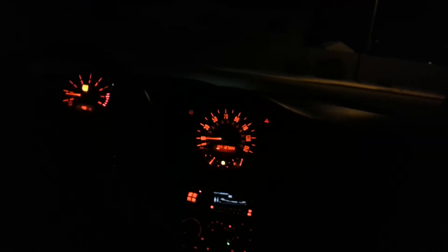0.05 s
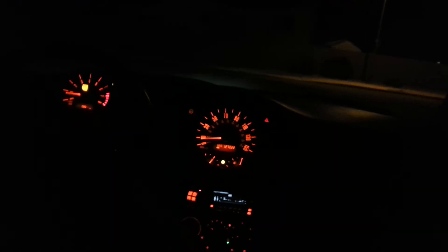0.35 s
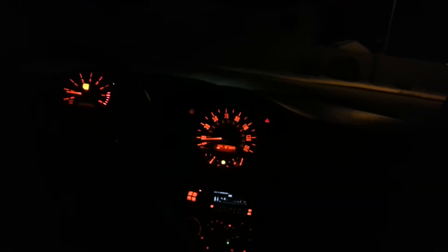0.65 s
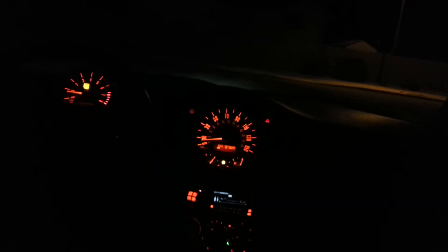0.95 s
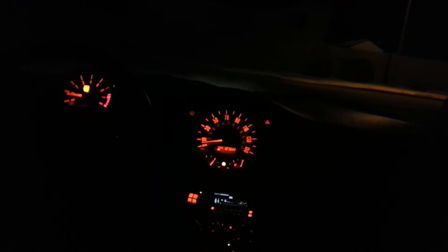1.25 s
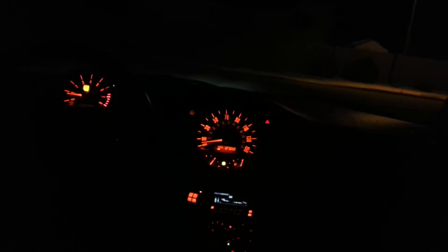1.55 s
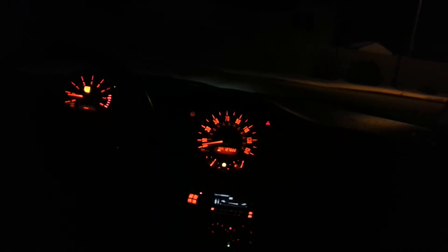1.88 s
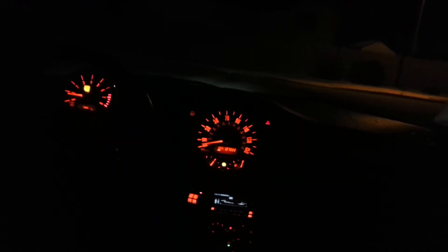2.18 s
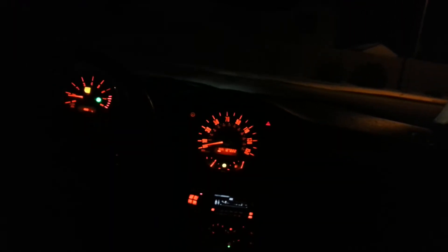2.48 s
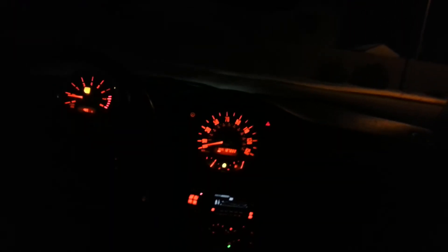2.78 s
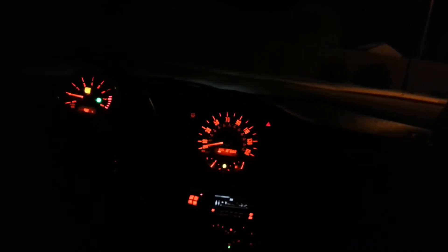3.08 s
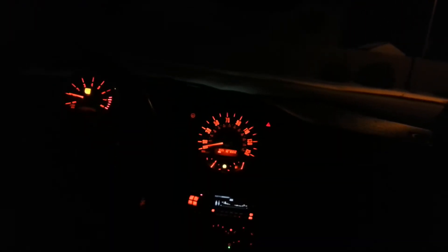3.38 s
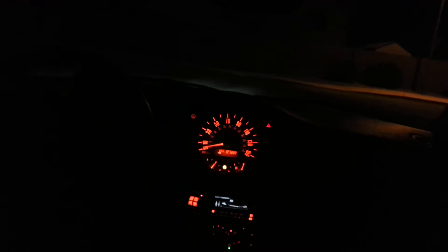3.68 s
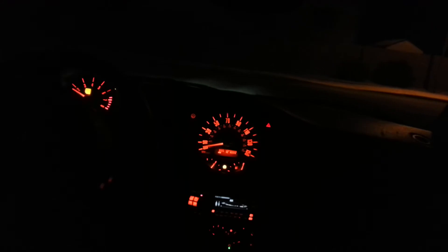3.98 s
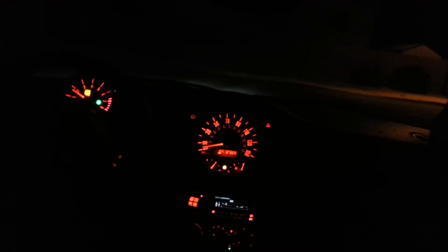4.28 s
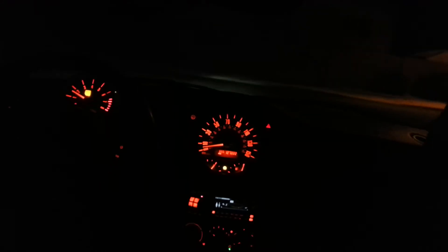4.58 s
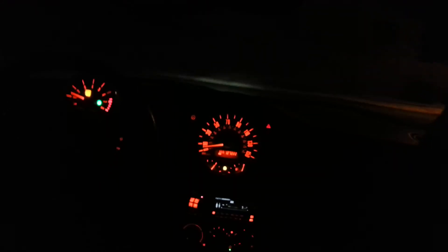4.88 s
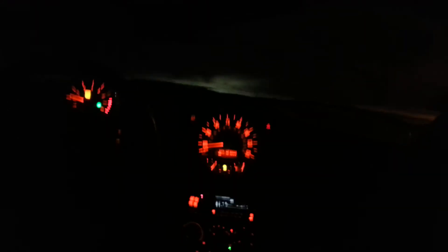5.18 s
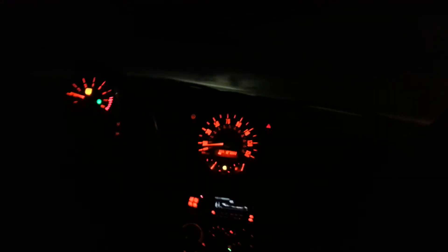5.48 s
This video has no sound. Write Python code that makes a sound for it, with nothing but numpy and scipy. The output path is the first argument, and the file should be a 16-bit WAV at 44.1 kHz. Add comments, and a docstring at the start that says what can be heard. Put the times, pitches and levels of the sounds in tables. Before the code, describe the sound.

Low tyre rumble and the hum of a four-cylinder engine fill a small car's interior, with soft road bumps and light trim clicks near the microphone. A sharp snap sets the turn signal ticking, and it keeps going to the end. Soon after, the car accelerates, the loud exhaust booming through the cabin and breaking into a raspy growl. It settles to a lower drone, with a final dull wheel thump.

```python
"""Inside a small four-cylinder car with a loud exhaust, rolling slowly at night.
At first the engine idles over rumbling tyres; hands rub on the controls, wheels thump and trim clicks.
Near 2.4 s the indicator stalk snaps over, and its relay ticks and tocks to the end.
Near 3 s the engine pulls and revs up in two steps, its orders booming through the cabin's resonances.
The exhaust breaks into a growl around 4 s, then the revs fall and the wheels take one last bump."""
import sys
import numpy as np
from scipy import signal
from scipy.fft import rfft, irfft, next_fast_len
from scipy.io import wavfile
from scipy.ndimage import uniform_filter1d, minimum_filter1d

SR = 44100
rng = np.random.default_rng(int(sys.argv[2]) if len(sys.argv) > 2 else 0)


def inscribe(sig):
    """Save sig as 16-bit PCM at rate SR to the path in sys.argv[1].

    A 1-D sig is mono; a 2-D sig holds one channel per row.
    Samples are clipped to [-1, 1] before scaling.
    """
    pcm = np.round(np.clip(np.atleast_2d(sig).T, -1, 1) * 32767)
    wavfile.write(sys.argv[1], SR, pcm.astype(np.int16))


N = 248724
T = np.arange(N) / SR


def from_db(db):
    """Decibels to gain."""
    return 10 ** (np.asarray(db) / 20)


def rms_one(x):
    """Scale to unit power."""
    return x / np.sqrt(np.mean(x ** 2) + 1e-20)


def in_time(rows):
    """Each column of an automation curve at every sample."""
    times, *columns = np.transpose(rows)
    return [np.interp(T, times, column) for column in columns]


def at_hz(points, hz):
    """Read a curve on a log-frequency axis."""
    freqs, values = np.transpose(points)
    return np.interp(np.log(hz + 1e-3), np.log(freqs), values)


def drift(rate):
    """Smooth random modulation with spread 1, changing about `rate` times a second."""
    hop = 100
    pole = np.exp(-2 * np.pi * rate * hop / SR)
    slow = signal.lfilter([1], [1, -2 * pole, pole ** 2], rng.standard_normal(N // hop + 502))[500:]
    return np.interp(np.arange(N) / hop, np.arange(len(slow)), rms_one(slow))


# Stereo width in the cabin. Each row: frequency in Hz, left-right likeness (1 is mono).
STEREO_LIKENESS = [(100, .995), (320, .98), (450, .7), (650, .45), (1000, 0), (14000, 0)]
def noise(spectrum, size=N, tilt_db=0):
    """Coloured stereo noise, near mono in the bass and wide in the treble; rms 1."""
    padded = next_fast_len(size)
    hz = np.fft.rfftfreq(padded, 1 / SR)
    mid, side = rfft(rng.standard_normal((2, padded)))
    alike = at_hz(STEREO_LIKENESS, hz)
    pair = np.sqrt(1 + alike) * mid + np.sqrt(1 - alike) * side * [[1], [-1]]
    lowest_hz = spectrum[0][0]
    colour = from_db(at_hz(spectrum, hz) + tilt_db * np.log2(1 + hz / lowest_hz))
    low_cut = hz ** 2 / (hz ** 2 + lowest_hz ** 2)
    return rms_one(irfft(pair * colour * low_cut, padded)[:, :size])


def response(modes, hz):
    """Complex gain of parallel resonances with alternating signs."""
    grid = np.arange(1, 4000.)
    gain = sum((-1) ** k * from_db(db) / (1 + 1j * (grid ** 2 - centre ** 2) / (grid * width))
               for k, (centre, width, db) in enumerate(modes))
    return np.interp(hz, grid, gain)


def overtones(speed, angle, orders, modes, half_order_db=0, flutter=.19):
    """Engine orders gliding through resonances; unequal cylinders add the half orders. Stereo, rms 1."""
    out, power = np.zeros((2, N)), 0
    for k in orders:
        gain = response(modes, k * speed) * from_db(half_order_db if k % 1 else 0)
        waver = 1 + flutter * (drift(8.9) + 1j * drift(10))
        # the many paths through the body scatter the phases
        line = gain * waver * np.exp(1j * (k * angle + 2 * np.pi * rng.random()))
        # short waves reach the two microphones out of step
        apart = np.arccos(at_hz(STEREO_LIKENESS, k * speed)) / 2 * rng.choice([-1, 1])
        out += np.cos(apart) * line.real + np.sin(apart) * line.imag * [[1], [-1]]
        power = power + np.abs(gain) ** 2
    return rms_one(out / np.sqrt(power))


def puffs(angle, depth):
    """Gas leaves in one puff per firing, two to a crank turn."""
    return rms_one(1 + depth * np.cos(2 * angle))


# Low resonances of pipe and cabin. Each row: centre in Hz, width in Hz, relative level in dB.
BOOM_RESONANCES = [(63.1, 1.6, 2.5), (114.9, 18.4, -0.5), (186, 47.4, -8.5), (227.3, 25.1, 1.5),
                   (247.8, 12.7, -11), (298.8, 28.2, -5.5), (325, 24.7, 2.5), (346, 73, -15.5),
                   (380.7, 52, -13)]
def exhaust_burble(speed, angle, level_db):
    """Unequal cylinders send fluttering half orders through the low resonances."""
    return from_db(level_db) * overtones(speed, angle, np.arange(2.5, 15), BOOM_RESONANCES)


# Orders 2 (the firing rate) to 12. Each row: relative level in dB, change at full growl in dB.
DRONE_ORDERS = [(1, 1), (0.5, -18.5), (1.34, -5), (-4.5, 19), (-0.5, 12.5), (-0.5, 5), (-2, 3), (-3, -6.5),
                (-8.5, 0), (-3, -3), (-5, 12)]
# The cabin's EQ; an order booms as it crosses a peak. Each row: frequency in Hz, gain in dB.
CABIN_EQ = [(50, -20), (67, -2), (76, -10.5), (88, -13), (101, -7), (116, 0), (124, -6.5), (145, -36.5),
            (168, -19.5), (200, -21), (228, -13.5), (245, -28), (297, -20.5), (324, -12), (365, -31),
            (560, -54)]
def drone(speed, angle, drive_db, growl):
    """Strong low orders coloured by the cabin, over the block's once-a-turn shake."""
    shake_db = -44.5 + 7.5 * np.log2(speed / speed.min())
    out = from_db(shake_db) * np.cos(angle)
    for k, (order_db, growl_db) in enumerate(DRONE_ORDERS, 2):
        # the cabin turns each order's phase and the silencer smears the pulses out
        phase = np.angle(response(BOOM_RESONANCES, k * speed)) - .3 * k * k
        waver_db = .2 * (k - 1) * drift(8)
        level_db = drive_db + order_db + growl_db * growl + at_hz(CABIN_EQ, k * speed) + waver_db
        out += from_db(level_db) * np.cos(k * angle + phase)
    return np.sqrt(2) * out


# High resonances of the tailpipe. Each row: centre in Hz, width in Hz, relative level in dB.
TAILPIPE_RESONANCES = [(650.4, 15.6, 1), (764, 34, -9), (826, 12, -11.5), (1010, 58, -12),
                       (1255, 29, -15.5), (1590, 96, -24.5), (1940, 120, -27)]
def exhaust_rasp(speed, angle, level_db):
    """Rushing gas at idle that turns into clear tailpipe tones as the engine revs."""
    clarity = .95 * (speed / speed.max()) ** 1.5
    lines = overtones(speed, angle, np.arange(9, 33, .5), TAILPIPE_RESONANCES, half_order_db=-6.745)
    gas_colour = [(300, -6), (420, 12.5), (650, 2.5), (850, -2.5),  # Hz, dB
                  (1200, -6.5), (1900, -10), (3500, -21), (9000, -54.5)]
    gas = noise(gas_colour) * puffs(angle, depth=.25)
    blend = np.sqrt(clarity) * lines + np.sqrt(2 * (1 - clarity)) * gas
    return from_db(level_db + 1.668 * drift(14)) * blend


# Colour of the intake air. Each row: frequency in Hz, relative level in dB.
INTAKE_COLOUR = [(900, -11.5), (1500, -0.5), (2000, 3.5), (2350, 3), (2700, 1.5), (4000, -2), (5200, -1),
                 (6200, -3.5), (7500, 3), (8600, -6), (11000, -10), (14500, -46.5)]
def intake_hiss(angle, level_db):
    """Air rushes into the engine, pulsing faintly at the firing rate."""
    return from_db(level_db) * noise(INTAKE_COLOUR) * puffs(angle, depth=.057)


# The rev curve. Each row: time in seconds, crank turns per second.
REVS = [(0, 23.6), (.16, 25.9), (.32, 22.3), (.75, 26.1), (2, 24.8), (2.6, 25.15), (2.8, 27.2), (2.9, 28.7),
        (3, 32.5), (3.27, 33), (3.43, 39.5), (3.52, 48.1), (3.69, 54.2), (4.08, 60.1), (4.33, 59.8),
        (4.45, 54.7), (4.6, 47.4), (4.85, 40.6), (5.06, 38), (5.3, 37.3), (5.64, 37.8)]
# Exhaust faders under load. Each row: time in seconds, burble in dB, rasp before the growl's boost in dB.
EXHAUST_FADERS = [(0, -33, -47), (.3, -30.5, -47.5), (1.1, -35, -52.5), (2.85, -32.5, -55),
                  (3.08, -28, -42), (3.3, -38, -45), (3.5, -26.5, -41.5), (3.7, -27.5, -35.5),
                  (3.92, -32, -37), (4.15, -23, -36), (4.5, -27.5, -39), (4.85, -28, -45.5),
                  (5.05, -26, -40), (5.64, -24.5, -40.5)]
def engine():
    """One crank drives drone, burble, rasp and hiss; load lifts them and high revs add a growl."""
    speed, = in_time(REVS)
    burble_db, rasp_db = in_time(EXHAUST_FADERS)
    pull = np.clip((T - 2.93) / .14, 0, 1)  # takes up the load at 2.93 s and holds it
    growl = np.clip((speed - 57.2) / 2.5, 0, 1)  # opens above 57.2 turns per second
    angle = 2 * np.pi * np.cumsum(speed) / SR + .012 * drift(12)
    return (drone(speed, angle, drive_db=-21 + 11 * pull, growl=growl)
            + exhaust_burble(speed, angle, burble_db)
            + exhaust_rasp(speed, angle, rasp_db + 7.5 * growl)
            + intake_hiss(angle, level_db=-55 + 6 * pull))


# Colour of tyres and ventilation. Each row: frequency in Hz, relative level in dB.
ROAD_COLOUR = [(18, 3), (30, -0.5), (55, 1), (110, -3.5), (160, 1), (230, 3.5), (325, -5.5), (380, -7),
               (480, -15), (700, -22.5), (1000, -24.5), (1600, -32), (3000, -46.5)]
def road_rumble():
    """Rolling tyres and ventilation lay down a dark, gently wavering bed."""
    return noise(ROAD_COLOUR) * from_db(-34 + .5 * drift(8.2))


# Panel hum, then pump whine. Each row: pitch in Hz, level in dB, wavers per second, wavering power share.
HUM_AND_WHINE = [(322, -36.5, 6, .2), (2370, -66, 60, 1)]
def cabin_hum_and_whine():
    """A cabin panel's steady 322 Hz hum rings beside a pump's faint, wavering whine."""
    out = 0
    for hz, db, rate, share in HUM_AND_WHINE:
        amplitude = np.sqrt(2 * (1 - share)) + np.sqrt(share) * (drift(rate) + 1j * drift(rate))
        out = out + from_db(db) * (amplitude * np.exp(2j * np.pi * hz * T)).real
    return out


# Hand moves. Each row: middle in seconds, half length in seconds, level in dB, tilt in dB per octave.
HAND_MOVES = [(0.231, 0.16, -41.5, -2), (0.586, 0.097, -49, -5.5), (1.266, 0.11, -42, -13),
              (1.593, 0.067, -50, 6), (1.789, 0.075, -53.5, 5), (2.889, 0.056, -44, 8.5),
              (5.468, 0.036, -47.5, 3.5)]
# Colour of the friction. Each row: frequency in Hz, relative level in dB.
RUB_COLOUR = [(300, -3), (800, -6.5), (2500, -4), (5000, -11.5), (7500, -8), (9000, -19), (13500, -32)]
def hand_rubs():
    """Hands slide on wheel and lever in soft swells of grainy friction noise."""
    out = np.zeros((2, N))
    for middle, half_length, db, tilt_db in HAND_MOVES:
        swell = np.exp(-((T - middle) / half_length) ** 2)
        out += from_db(db) * swell * noise(RUB_COLOUR, tilt_db=tilt_db)
    grain = from_db(2.2 * drift(45))
    return out * grain


def knocks(hits, colour, t60, rise_s, modes=()):
    """One part struck at each hit: a crack, a dense ring dying fast in the padded cabin, any modes."""
    t = T[:SR // 3]
    crack = .24 * np.exp(-t / .0058)
    ring = noise(colour, size=len(t)) * (from_db(-60 * t / t60) + crack)
    for hz, db, mode_t60 in modes:
        ring += from_db(db - 60 * t / mode_t60) * np.sin(2 * np.pi * (hz * t + rng.random((2, 1))))
    ring *= 1 - np.exp(-t / rise_s)
    out = np.zeros((2, N + len(t)))
    for start, db in hits:
        at = round(start * SR)
        out[:, at:at + len(t)] += from_db(db) * ring
    return out[:, :N]


# Bumps in the road. Each row: start in seconds, level in dB.
BUMP_HITS = [(0.147, -20.5), (0.245, -29), (1.103, -26.5), (5.355, -21)]
# Colour of the thump. Each row: frequency in Hz, relative level in dB.
BUMP_COLOUR = [(110, -4), (200, -4), (300, -4), (400, 3), (520, -4), (620, -13), (800, -16), (1500, -24),
               (3000, -42), (8000, -58)]
def wheel_bumps():
    """The wheels roll over bumps with a dull, soft-edged thump."""
    return knocks(BUMP_HITS, BUMP_COLOUR, t60=.16, rise_s=.005)


# Clicks of gear lever and trim. Each row: start in seconds, level in dB.
TRIM_HITS = [(0.197, -38), (1.282, -45.5), (2.292, -43.5), (3.545, -39), (3.585, -26), (3.592, -30.5),
             (3.603, -29), (4.579, -41.5), (4.715, -42), (5.22, -41.5)]
# Colour of the click. Each row: frequency in Hz, relative level in dB.
TRIM_COLOUR = [(800, -1.5), (2400, -3), (3300, 1), (4000, 1), (5300, 2.5), (6500, -1.5), (7500, -0.5),
               (9000, -7.5), (11000, -15.5), (14000, -36)]
# The trim's clear modes. Each row: pitch in Hz, relative level in dB, seconds to fall 60 dB.
TRIM_MODES = [(3120, -20, .07), (5250, -10, 0.065)]
def trim_clicks():
    """Gear lever and trim knock lightly, giving small bright clicks."""
    return knocks(TRIM_HITS, TRIM_COLOUR, t60=.12, rise_s=.0019, modes=TRIM_MODES)


# The relay's ticks and tocks. Each entry: start in seconds.
TICK_STARTS = [2.373, 3.029, 3.663, 4.3176, 4.9532, 5.5887]
TOCK_STARTS = [2.727, 3.3646, 4.0169, 4.652, 5.2874]
# Colour of each stroke. Each row: frequency in Hz, relative level in dB.
TICK_COLOUR = [(500, -28), (1000, -3.5), (1500, -6), (1880, -3), (2100, -7), (3800, -8), (5050, 1.5),
               (5500, -3.5), (7200, 2), (8000, -10.5), (10500, -17.5), (14000, -38)]
TOCK_COLOUR = [(500, 20), (1100, -2), (1330, 1.5), (1700, -14.5), (2450, -1.5), (3400, -11), (4300, -18),
               (5000, -8), (5500, -13), (6500, -7.5), (9000, -16.5), (14000, -17)]
# Modes of the relay's case. Each row: pitch in Hz, relative level in dB, seconds to fall 60 dB.
TICK_CASE_MODES = [(1880, -11, .085), (5050, -8, .085), (7250, -7, .08)]
TOCK_CASE_MODES = [(1330, -4, .09), (2460, -10, .08), (6420, -11, .07)]
def indicator_relay(tick_db=-28, tock_db=-32):
    """The relay pulls in with a sharp tick and lets go with a duller tock, ringing its case."""
    pull_ins = [(start, tick_db) for start in TICK_STARTS]
    releases = [(start, tock_db) for start in TOCK_STARTS]
    ticks = knocks(pull_ins, TICK_COLOUR, t60=.094, rise_s=.00013, modes=TICK_CASE_MODES)
    tocks = knocks(releases, TOCK_COLOUR, t60=.11, rise_s=.0004, modes=TOCK_CASE_MODES)
    return ticks + tocks


# The stalk's snap. Each row: start in seconds, level in dB.
SNAP_HITS = [(2.4379, -11.5)]
# Colour of the snap. Each row: frequency in Hz, relative level in dB.
SNAP_COLOUR = [(200, 8.5), (500, -9), (1000, -3.5), (1500, -10), (2350, -5.5), (3000, -7), (4600, -7),
               (5400, 2.5), (6600, -7), (7700, 1), (9000, -9.5), (13500, -22.5)]
# The stalk's clear modes. Each row: pitch in Hz, relative level in dB, seconds to fall 60 dB.
SNAP_MODES = [(556, -15, .11), (2380, -13, .12), (5440, -11, .07)]
def indicator_stalk():
    """The stalk snaps over once and rings briefly."""
    return knocks(SNAP_HITS, SNAP_COLOUR, t60=.088, rise_s=.002, modes=SNAP_MODES)


def scene():
    """Engine and road fill the cabin; the small sounds are close by."""
    road = road_rumble() + wheel_bumps()
    controls = indicator_relay() + indicator_stalk() + trim_clicks()
    return road + controls + engine() + cabin_hum_and_whine() + hand_rubs()


def limiter(x, ceiling=.77, window=SR // 30):
    """The gain ducks smoothly around any peak above the ceiling."""
    gain = np.minimum(1, ceiling / (np.abs(x).max(axis=0) + 1e-9))
    held = minimum_filter1d(gain, size=window)
    return x * uniform_filter1d(held, size=window)


# Balance of the two microphones. Each row: frequency in Hz, left minus right in dB.
MIC_BALANCE = [(60, -.8), (300, .4), (550, -1), (1000, 3.5), (2200, 3), (4000, 3), (6000, 2.5), (6800, -2),
               (7600, -10), (9500, -6), (13000, -2)]
# Phase between them. Each row: frequency in Hz, the left's lead in radians.
MIC_LEAD = [(120, .23), (350, .15), (700, 0)]
def record(dry):
    """Each microphone port has its own colour and phase; peaks are limited and the top is cut."""
    padded = next_fast_len(N + SR // 10)
    hz = np.fft.rfftfreq(padded, 1 / SR)
    split = np.array([[.5], [-.5]])
    ports = from_db(split * at_hz(MIC_BALANCE, hz)) * np.exp(1j * split * at_hz(MIC_LEAD, hz))
    ports /= np.sqrt(np.mean(np.abs(ports) ** 2, axis=0))
    coloured = irfft(rfft(dry, padded) * ports, padded)[:, :N]
    high_cut = signal.cheby2(16, 60, 15100, fs=SR, output="sos")  # 60 dB down from 15.1 kHz
    return signal.sosfilt(high_cut, limiter(coloured))


dry = scene()
out = record(dry)
inscribe(out)
```